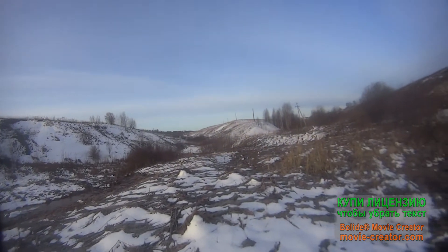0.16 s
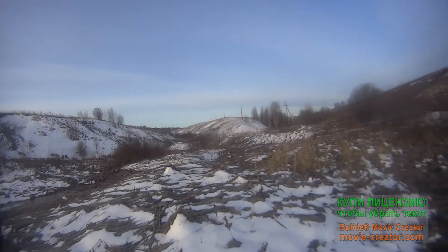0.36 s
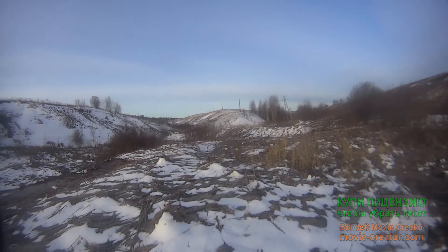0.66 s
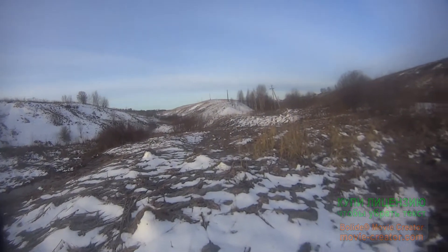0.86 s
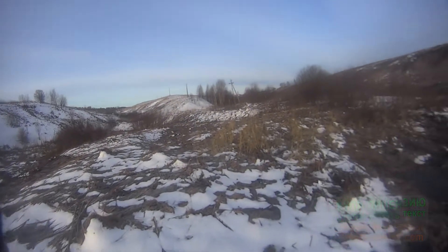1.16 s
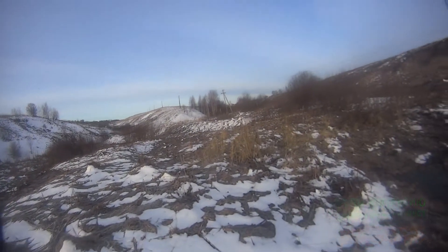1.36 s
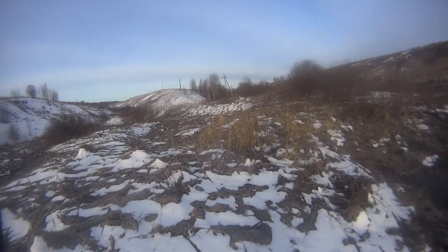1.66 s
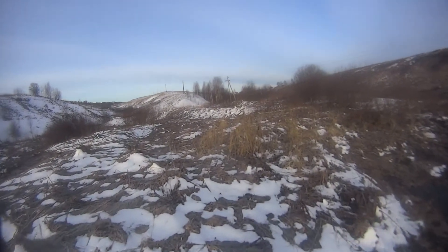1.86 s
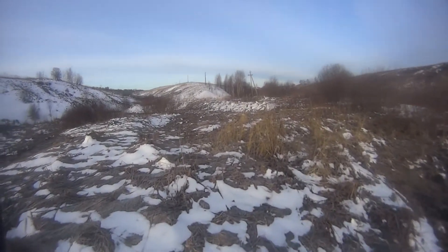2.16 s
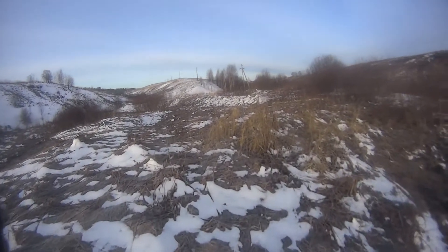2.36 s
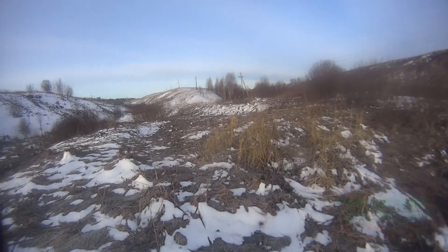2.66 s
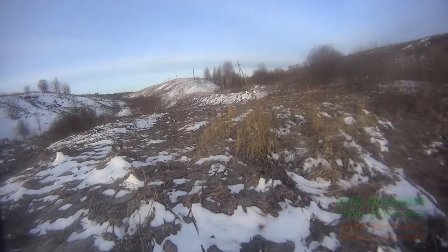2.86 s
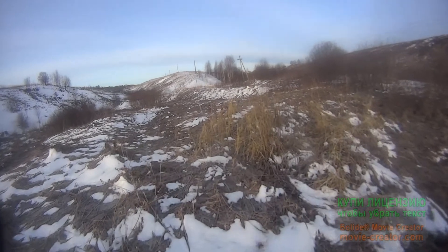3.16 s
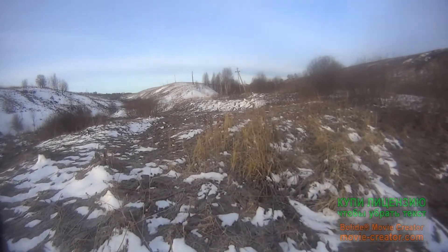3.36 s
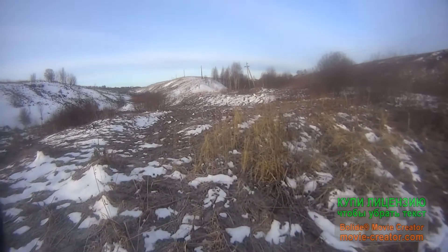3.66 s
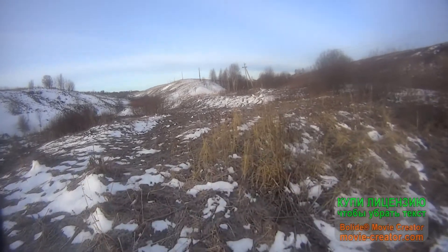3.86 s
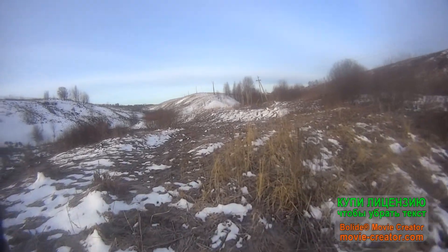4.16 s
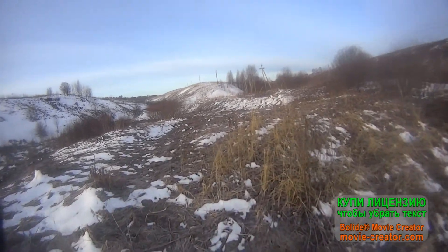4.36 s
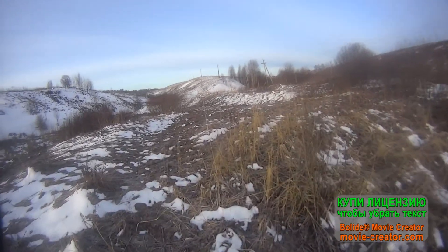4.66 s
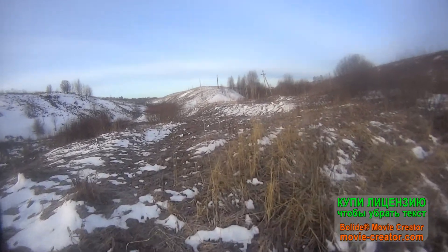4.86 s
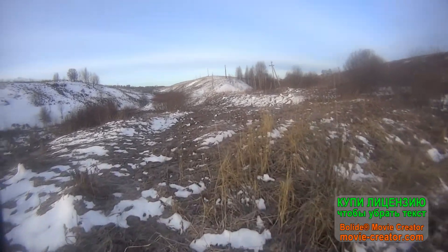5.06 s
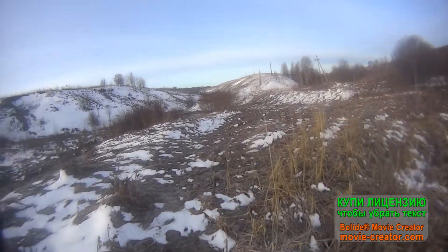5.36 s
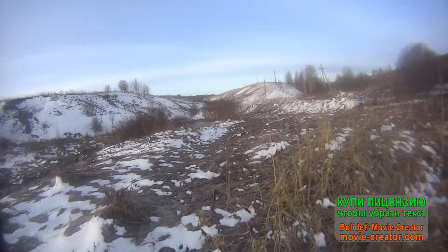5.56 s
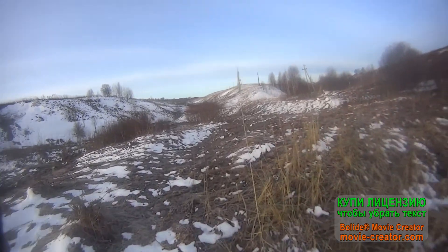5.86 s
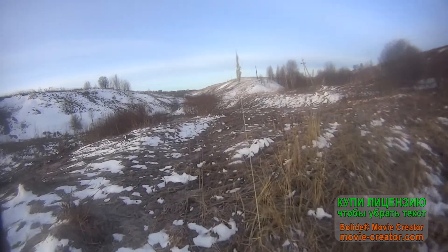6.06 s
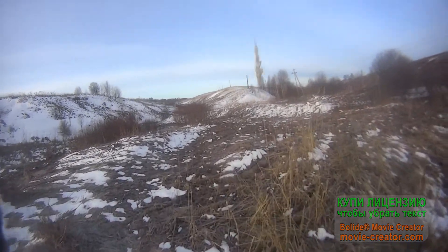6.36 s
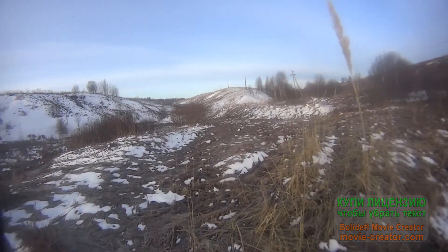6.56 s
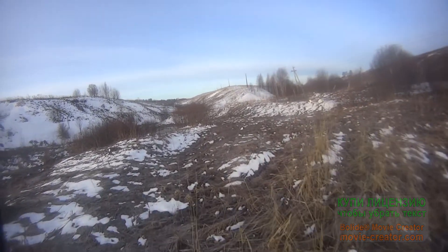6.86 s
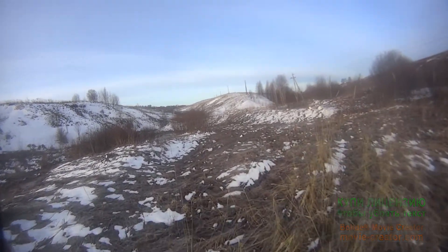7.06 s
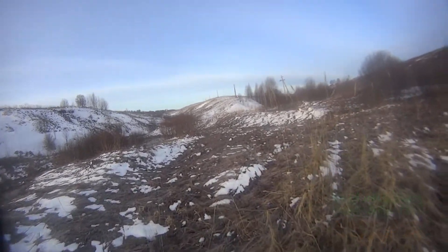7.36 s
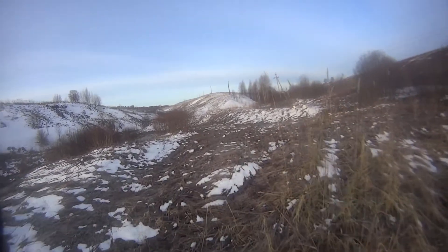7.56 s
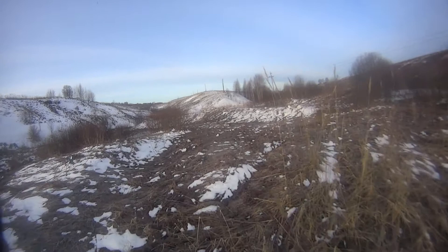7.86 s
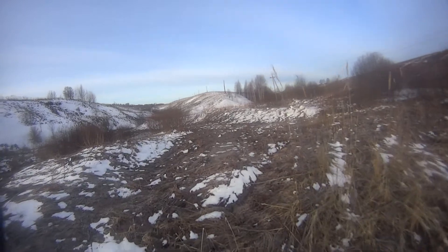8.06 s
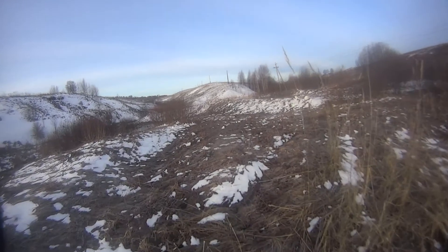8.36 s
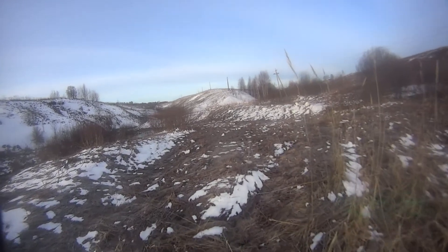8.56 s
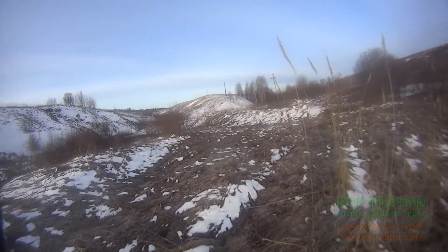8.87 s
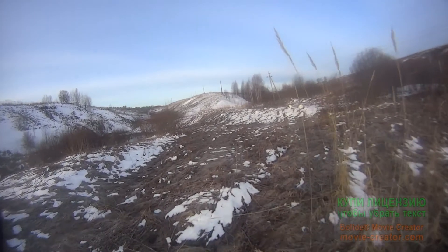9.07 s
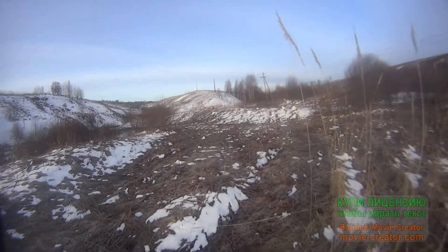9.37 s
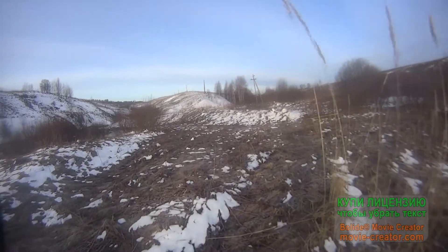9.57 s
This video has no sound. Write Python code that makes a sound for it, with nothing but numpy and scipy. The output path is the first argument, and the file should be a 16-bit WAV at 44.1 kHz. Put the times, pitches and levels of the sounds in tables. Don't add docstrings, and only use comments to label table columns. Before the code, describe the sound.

Someone walks slowly across a field of dry grass and crusty snow, about one step every 0.7 seconds. Each step is a dense, brittle crackle with swishing stalks and sharp separate snaps. Near two seconds a strap knocks the camera's plastic shell with a small bump. The last steps are loudest. A chest-high stereo microphone hears it slightly coloured and ringing, over light wind and hiss.

```python
import sys
import numpy as np
from scipy import signal
from scipy.fft import rfft, irfft, next_fast_len
from scipy.io import wavfile
from scipy.ndimage import uniform_filter1d

SR = 44100
rng = np.random.default_rng(int(sys.argv[2]) if len(sys.argv) > 2 else 0)


def volts(x):
    e = np.asarray(x, float) / 20
    return 10 ** e


def to_wav(s):
    ch = np.atleast_2d(s).T
    pcm = np.round(np.clip(ch, -1, 1) * 32767)
    wavfile.write(sys.argv[1], SR, pcm.astype(np.int16))


N = 427769
SIZE = next_fast_len(N + 8192)
HZ = np.fft.rfftfreq(SIZE, 1 / SR)
CRUNCH_AT_DB = -44.5

# (low edge [Hz], high edge [Hz], polarity [+1 or -1])
PARTS = ((435, 2160, 1), (2210, 3520, -1), (4350, 21000, 1))


def level(x, db):
    return x * volts(db) / np.sqrt(np.mean(x ** 2))


def curves(table):
    s, *columns = np.transpose(table)
    return [np.interp(np.arange(N) / SR, s, c) for c in columns]


def along(points):
    hz, value = np.transpose(points)
    return np.interp(np.log(HZ + 1), np.log(hz + 1), value)


def through(x, response):
    return irfft(rfft(x, SIZE) * response, SIZE)[..., :N]


def causal(db):
    cepstrum = irfft(db * np.log(10) / 20, SIZE)
    cepstrum[1:SIZE // 2] *= 2
    cepstrum[SIZE // 2 + 1:] = 0
    return np.exp(rfft(cepstrum))


def band(x, low_hz, high_hz, polarity=1):
    sos = signal.butter(2, [low_hz, high_hz], "band", fs=SR, output="sos")
    return polarity * signal.sosfilt(sos, x)


def walk(rate):
    k = int(SR / rate)
    steps = np.repeat(rng.standard_normal(N // k + 1), k)
    return uniform_filter1d(uniform_filter1d(steps, k), k)[:N]


def clicks(seconds, sizes):
    x = np.zeros(N)
    at = np.clip((np.asarray(seconds) * SR).astype(int), 0, N - 1)
    np.add.at(x, at, sizes)
    return x


def port_colour():
    # (frequency [Hz], level [dB])
    ground = [(500, -16.5), (800, -13.5), (1300, -9.5), (2200, -14), (4000, -10), (6000, -14.5),
              (9000, -15.5), (10800, -17)]
    # (pitch [Hz], width [Hz], level [dB])
    ports = [(1311, 27, -7.5), (2804, 510, -4), (2890, 280, -6), (5050, 550, -1), (7810, 3040, -4)]
    port_lift_db = 17
    lift = 0
    for hz, width, db in ports:
        lift = lift + volts(db + port_lift_db) ** 2 / (1 + ((HZ - hz) / width * 2) ** 2)
    return causal(along(ground) + 10 * np.log10(1 + lift))


def hiss():
    # (frequency [Hz], density [dB per Hz])
    common = [(12, -39), (20, 6.5), (252, 3.5), (416, -2.5), (896, 4), (2790, -7), (11000, -8.5),
              (14300, -80)]
    # (frequency [Hz], density [dB per Hz])
    apart = [(20, -29), (180, -22), (300, -10.5), (650, -7.5), (1800, -10), (11000, -22.5)]
    common_db, apart_db = -62.5, -57.5
    whine_hz, whine_db = 6772, -77
    port = np.sqrt(1 + volts(5) ** 2 / (1 + ((HZ - 2830) / 240) ** 4))
    mid = through(rng.standard_normal(N), port * volts(along(common)))
    mid = level(mid * volts(1.5 * walk(14)), common_db)
    side = level(through(rng.standard_normal(N), volts(along(apart))), apart_db)
    whine = volts(whine_db) * np.sin(2 * np.pi * whine_hz * np.arange(N) / SR)
    return mid + whine + side * np.array([[1], [-1]])


def wind():
    # (time [s], rumble [dB], cloth and ground [dB])
    gusts = [
        (0.0, -73.5, -67),
        (1.38, -67, -61.5),
        (1.84, -68, -68),
        (2.16, -51, -49.5),
        (2.27, -66, -60),
        (3.94, -68.5, -67.5),
        (4.32, -66, -60.5),
        (7.89, -68.5, -67.5),
        (9.7, -67, -62),
    ]
    rumble_db, cloth_db = curves(gusts)
    air = rng.standard_normal(N) + .3 * rng.standard_normal((2, N))
    rumble = level(band(air, 18, 75) * volts(3 * walk(9)), 1.5)
    rumble = rumble * volts(np.minimum(rumble_db, -64))
    cloth = band(rng.standard_normal((2, N)), 122, 500) * volts(3.7 * walk(25))
    return rumble + level(cloth, 0.35) * volts(cloth_db)


def stride():
    # (time at full weight [s], rustle [dB], rise [s], hold [s], fade [dB per s])
    footfalls = [(0.514, -47.5, 0.219, 0.15, 135), (1.3, -44, 0.09, 0.11, 42),
                 (1.986, -46, 0.015, 0.019, 15.5), (2.66, -38, 0.057, 0.039, 48),
                 (3.386, -47, 0.018, 0.008, 13.5), (4.172, -47, 0.013, 0.23, 50),
                 (4.88, -42.5, 0.09, 0.19, 101), (5.801, -43, 0.14, 0.022, 52),
                 (6.562, -46.5, 0.1, 0.022, 22), (7.237, -47.5, 0.46, 0.027, 124),
                 (7.988, -45.5, 0.45, 0.21, 123), (8.737, -41.5, 0.44, 0.26, 57),
                 (9.479, -32, 0.06, 0.017, 81)]
    # (time at the middle [s], rustle [dB], half length [s])
    sweeps = [(-0.025, -63.4, 0.24), (0.494, -43, 0.05), (1.097, -56.5, 0.18), (1.258, -43.5, 0.051),
              (1.666, -51.5, 0.11), (1.807, -51.5, 0.069), (2.031, -40, 0.054), (2.358, -48, 0.079),
              (3.1, -51.5, 0.16), (3.257, -56.5, 0.071), (3.46, -41, 0.091), (3.55, -44, 0.16),
              (4.218, -39, 0.058), (4.448, -42.5, 0.13), (4.69, -45, 0.31), (4.941, -39.5, 0.057),
              (5.258, -53.5, 0.13), (5.385, -49, 0.035), (5.513, -49, 0.135), (5.692, -45.5, 0.12),
              (6.275, -51.5, 0.51), (6.456, -46.5, 0.11), (6.637, -39.5, 0.036), (7.007, -54.5, 0.11),
              (7.396, -48.5, 0.13), (7.532, -58, 0.066), (7.66, -58, 0.092), (7.984, -42, 0.045),
              (8.125, -42.5, 0.065), (9.288, -45, 0.23)]
    rise_db, sweep_db, rest_db = 30, 20, -66
    crunch_base_db, crunch_share, fine_db = -8, 0.8, 4
    t = np.arange(0, N / SR, .001)
    power = volts(rest_db) ** 2
    for s, db, rise, hold, fade in footfalls:
        before_db = rise_db * np.clip((s - t) / rise, 0, 5)
        after_db = fade * np.clip(t - s - hold, 0, 5)
        power = power + volts(db - before_db - after_db) ** 2
    for s, db, half in sweeps:
        power = power + volts(db - sweep_db * np.minimum(((t - s) / half) ** 2, 5)) ** 2
    rustle_db = np.interp(np.arange(N) / SR, t, 10 * np.log10(power))
    crunch_db = crunch_base_db - (1 - crunch_share) * (rustle_db - CRUNCH_AT_DB) + 4.1 * walk(12)
    blades_db = fine_db + 0.5 * walk(12)
    return rustle_db, crunch_db, blades_db


def grass(colour, rustle_db, crunch_db, blades_db):
    dice = rng.random((N, 2)).T
    bed = (dice[0] < .5) * volts(2.4 * walk(70)) * rng.standard_normal(N)
    tick_db = 10.5 + np.minimum(-3.5 * np.log(dice[1]), 7)
    ticks = (dice[0] > .993) * volts(tick_db) * np.sign(rng.standard_normal(N))
    out = 0
    for edges, db, stray in zip(PARTS, (crunch_db + 5.0, .1, blades_db), (.6, .3, .35)):
        tick_balance = volts(np.clip(4 * rng.standard_normal(N), -12, 4))
        near = bed * volts(1.5 * walk(40)) + ticks * tick_balance
        aside = stray * near * rng.standard_normal((2, N))
        part = through(band(near + aside, *edges), colour)
        out = out + level(part, 1.37) * volts(rustle_db + db)
    return out


def crackles(colour, rustle_db):
    # (time [s], peak [dB], pitch [Hz])
    cracks = [(0.5104, -35, 2780), (0.7882, -28, 2840), (1.2528, -23, 2800), (1.28, -19, 2840),
              (1.289, -20, 2840), (1.6077, -31, 5120), (1.699, -28, 5200), (1.8252, -24, 2690),
              (2.648, -24, 2680), (2.7367, -20, 2920), (3.4165, -21, 3020), (4.1698, -26, 2710),
              (4.4245, -20, 2900), (4.447, -25, 3140), (4.9654, -25, 2710), (6.5964, -25, 2820),
              (6.8818, -26, 2660), (7.1722, -22.5, 2680), (7.3695, -20.5, 2900), (7.4293, -24, 3080),
              (8.0237, -21, 2940), (8.6033, -28, 2930), (8.687, -20, 2750), (8.7364, -21, 2600),
              (8.79, -29, 2910), (8.8303, -17.5, 2900), (8.867, -14, 2950), (8.958, -16.5, 2800),
              (9.4983, -8.5, 2700), (9.6144, -18.5, 2860)]
    count, crackle_db, crack_db, crack_s = 2400, 4.5, 2.1, .0014
    dice = rng.random((count, 4)).T
    s, db, hz = np.transpose(cracks)
    loose = dice[0] * N / SR
    under_db = rustle_db[(loose * SR).astype(int)]
    spread_db = np.clip(4 - .12 * (under_db - CRUNCH_AT_DB), 3, 6)
    loose_db = under_db + crackle_db + spread_db * np.minimum(-np.log(dice[1]), 3.2)
    s, db = np.r_[s, loose], np.r_[db + crack_db, loose_db]
    lasts = crack_s * np.r_[1 + 0 * hz, .3 + 1.4 * dice[3]]
    hz = np.r_[hz, 1500 * 2 ** (2.6 * dice[2])]
    t, f = np.arange(384) / SR, np.fft.rfftfreq(384, 1 / SR)
    shape = np.exp(-(np.log2((f + 1) / hz[:, None]) / 0.44) ** 2) + 0.29
    burst = irfft(rfft(rng.standard_normal((len(s), len(t)))) * shape)
    burst = burst * np.exp(-t / lasts[:, None]) * (1 - np.exp(-t / 0.00042))
    rms = np.sqrt((burst ** 2).sum(axis=1, keepdims=True) / (lasts[:, None] * SR))
    burst = burst / rms * volts(db)[:, None]
    at_port = np.interp(hz, HZ, np.abs(colour))[:, None] ** 0.79
    sides = volts(np.array([[1], [-1]]) * walk(200))
    pushes = clicks(s[:, None] + t + .5 / SR, burst / at_port * 0.44)
    return through(pushes * sides, colour)


def thuds():
    # (time [s], peak [dB], pitch [Hz])
    heels = [(0.5, -54, 70.0), (1.2, -58, 118), (2.618, -53, 67.3), (3.379, -63, 40.4), (4.128, -62, 40.4),
             (4.869, -49, 61.9), (5.299, -61, 86.1), (5.651, -48, 71), (6.62, -42, 40.6), (7.95, -53, 67),
             (8.671, -48, 60), (9.458, -56, 40.4)]
    t, out = np.arange(N) / SR, 0
    for s, db, hz in heels:
        since = np.clip(t - s, 0, None)
        out = out + volts(db + 3) * np.sin(2 * np.pi * hz * since) * np.exp(-since / .011)
    return out


def snaps(colour):
    # (time [s], peak [dB], pitch [Hz])
    stalks = [(0.5711, -29.5, 4790), (0.6493, -26, 4830), (1.368, -25, 4670), (1.4001, -25.5, 4970),
              (1.4729, -23, 5460), (1.5292, -30.5, 4880), (1.554, -27, 5360), (1.643, -33, 5540),
              (1.83, -30, 5360), (1.899, -35.5, 5410), (3.1184, -14.5, 4030), (3.1477, -29.5, 5660),
              (3.3859, -22.5, 4340), (3.5707, -29, 5670), (5.302, -33, 5510), (5.937, -28.5, 5150),
              (6.1612, -26, 4900), (6.6287, -25.5, 5640), (7.7988, -33.5, 5050), (7.8128, -33.5, 5350),
              (8.3448, -35, 4300), (8.6955, -24, 4120), (9.0754, -24.5, 4610), (9.1742, -38, 5270),
              (9.2252, -23, 5500), (9.232, -24.5, 5590), (9.2626, -23, 5540), (9.3073, -24, 4000),
              (9.484, -14.5, 5550), (9.5703, -26, 4220)]
    # (time [s], peak [dB], pitch [Hz])
    blades = [(0.6279, -26, 6360), (0.6742, -26.5, 7100), (1.0378, -31.5, 6510), (1.4097, -22, 6650),
              (1.514, -21, 5780), (2.0615, -24, 7020), (2.0798, -24, 6080), (2.3732, -24, 6450),
              (2.4302, -29.5, 6730), (3.3746, -34, 7020), (3.5827, -24, 7020), (3.6841, -28, 6310),
              (3.7043, -23.5, 7020), (4.1292, -35, 6940), (4.2366, -20, 5960), (4.6645, -24, 6680),
              (4.6716, -31, 6070), (4.9289, -26, 6800), (5.0643, -21, 7020), (5.3779, -28, 6310),
              (5.7776, -27.5, 5710), (5.8442, -20, 6260), (6.6512, -25, 6620), (6.7357, -22, 7020),
              (6.9817, -25, 6050), (7.2221, -26, 6430), (7.5197, -28, 5960), (8.7197, -18.5, 6600),
              (8.7271, -18.5, 5780), (9.591, -27, 5810)]
    even_hz, tilt_db_per_octave = 4670, 31
    thick_db, middle_lift_db, thin_db = -11.5, 5, 8.5
    s, db, hz = np.transpose([*stalks, *blades])
    tilt_db = tilt_db_per_octave * np.log2(hz / even_hz)
    middle_db = db - np.maximum(tilt_db, 0)
    parts_db = middle_db + thick_db, middle_db + middle_lift_db, middle_db + tilt_db + thin_db
    dice = rng.random((len(s), 8))
    late = np.cumsum(.4 + dice[:, :4], axis=1) * .0004 - .0007
    fibres = np.sign(dice[:, 4:] - .5) * np.array([1, .35, .35, .25])
    colour = colour / (1 + 1j * HZ / 7000)
    out, impulse = 0, irfft(colour, SIZE)[:2048]
    for edges, part_db, crest_db in zip(PARTS, parts_db, (-2.5, -3, -4)):
        ring = band(impulse, *edges)
        push = clicks(s[:, None] + late, fibres * volts(part_db)[:, None])
        out = out + volts(crest_db) * band(push, *edges) / np.abs(ring).max()
    return through(out, colour)


def scuffs():
    # (time [s], half length [s], level [dB], low edge [Hz], high edge [Hz])
    strokes = [
        (0.967, 0.11, -60.5, 900, 1800),
        (5.34, 0.067, -53.5, 500, 1100),
        (8.09, .11, -57.5, 1220, 1450),
    ]
    t, cloth, out = np.arange(N) / SR, rng.standard_normal(N), 0
    for s, half, db, low_hz, high_hz in strokes:
        out = out + level(band(cloth, low_hz, high_hz), db) * np.exp(-((t - s) / half) ** 2)
    return out


def housing():
    # (time [s], peak [dB], pitch [Hz])
    knocks = [(1.898, -30.5, 960), (2.09, -29.5, 1400), (2.155, -16, 933), (2.19, -27, 1070),
              (2.621, -30.5, 960), (3.373, -29, 1030), (4.128, -28.5, 1290), (4.236, -27.5, 1040),
              (4.863, -30, 1500), (5.648, -26.5, 1000), (7.156, -32.5, 736), (7.955, -31, 1580),
              (8.667, -30, 1020), (9.043, -34.5, 1330), (9.454, -32.5, 1400)]
    out, t = np.zeros(N), np.arange(1500) / SR
    for s, db, hz in knocks:
        modes = (340, .15), (820, .45), (hz, .6), (1500, .45), (2050, .12)  # (pitch [Hz], share)
        ring = sum(share * np.sin(2 * np.pi * f * t) for f, share in modes)
        ring = ring * np.exp(-t / 0.0021) * (1 - np.exp(-t / 0.00076))
        start = int(s * SR)
        out[start:start + len(t)] += volts(db + 7.0) * (ring + 0.077 * np.roll(ring, 70))
    return out


def jolts():
    # (time [s], push [dB], length [s], sign and size)
    pushes = [
        (2.066, -40, 0.018, 0.81),
        (2.075, -36, 0.021, -1.1),
        (2.086, -28, 0.013, 0.95),
        (2.097, -39, 0.023, -0.85),
        (2.148, -40, 0.017, 0.92),
        (2.152, -35, 0.018, -1.1),
        (2.182, -35, 0.017, 1),
        (2.193, -35.5, 0.0072, -1.1),
        (5.334, -38, 0.013, 0.57),
    ]
    t, out = np.arange(N) / SR, 0
    for s, db, length, sign in pushes:
        out = out + sign * volts(db) * np.exp(-((t - s) / (0.27 * length)) ** 2)
    return out


def two_ports(outside):
    # (frequency [Hz], lead [rad])
    lead = [(0, 0), (340, -1.9), (650, -2.2), (1720, -1.5), (2500, -.2), (3010, -1.1), (4000, -.2),
            (12000, -.1)]
    # (frequency [Hz], level [dB])
    lean = [(350, -.5), (1120, -4), (2010, -1), (3610, -.5), (6480, -1.2)]
    half = volts(along(lean) / 2) * np.exp(.5j * np.interp(HZ, *np.transpose(lead)))
    return through(outside, np.array([half, 1 / half]))


def scene():
    colour, effort = port_colour(), stride()
    bed_db = -4
    outside = volts(bed_db) * grass(colour, *effort) + crackles(colour, effort[0])
    outside = outside + snaps(colour) + housing()
    at_camera = jolts() + thuds() + scuffs() + wind() + hiss()
    return two_ports(outside) + at_camera * volts([[-.4], [.4]])


def band_limit(x):
    return signal.sosfilt(signal.butter(12, 12240, fs=SR, output="sos"), x)


def record(dry):
    # (frequency [Hz], gain [dB])
    top = [(10000, 0), (10950, -2), (11080, -24), (11500, -42), (13000, -55), (22000, -60)]
    return band_limit(through(dry, causal(along(top))))


dry = scene()
out = record(dry)
to_wav(out)
```